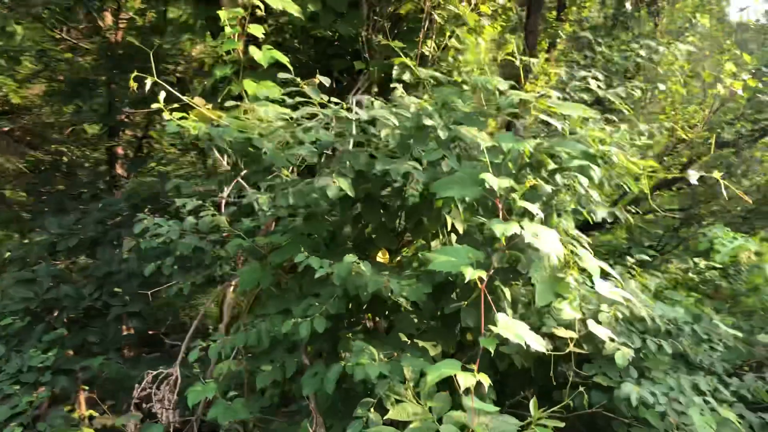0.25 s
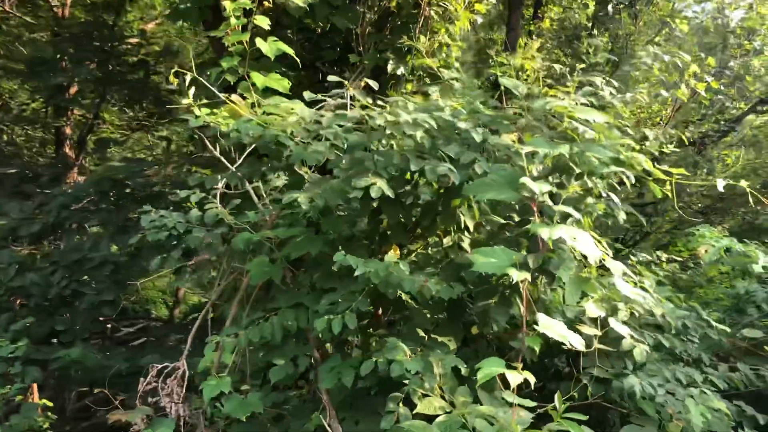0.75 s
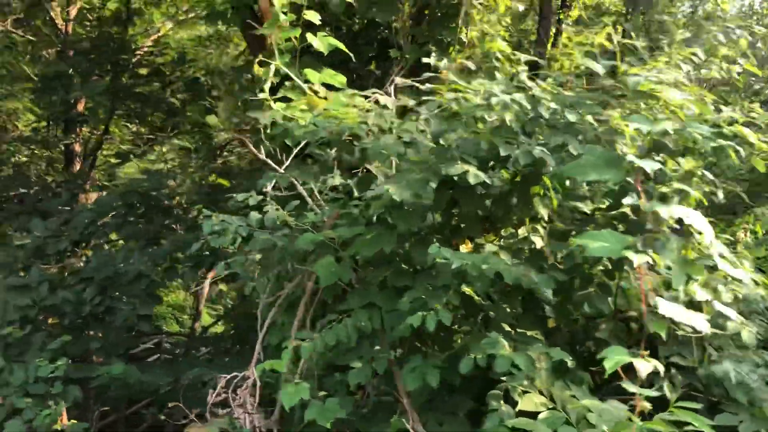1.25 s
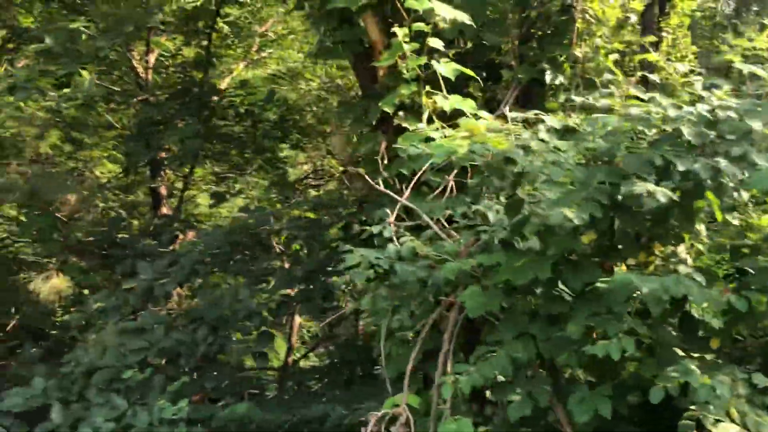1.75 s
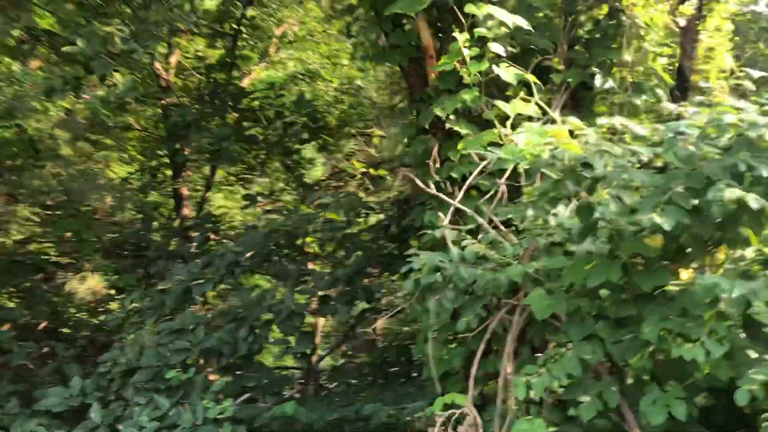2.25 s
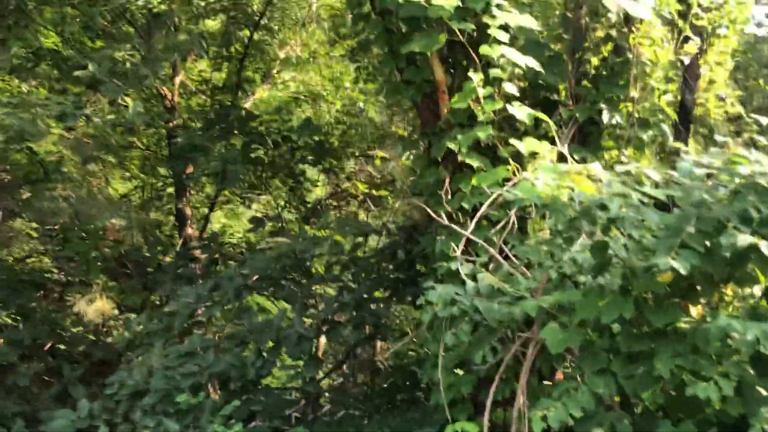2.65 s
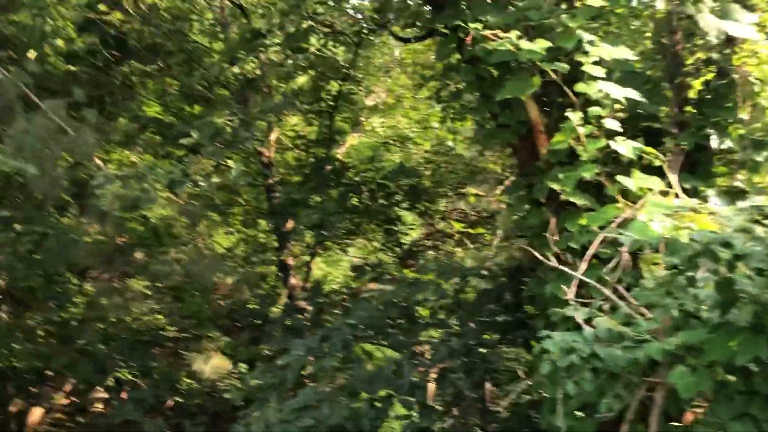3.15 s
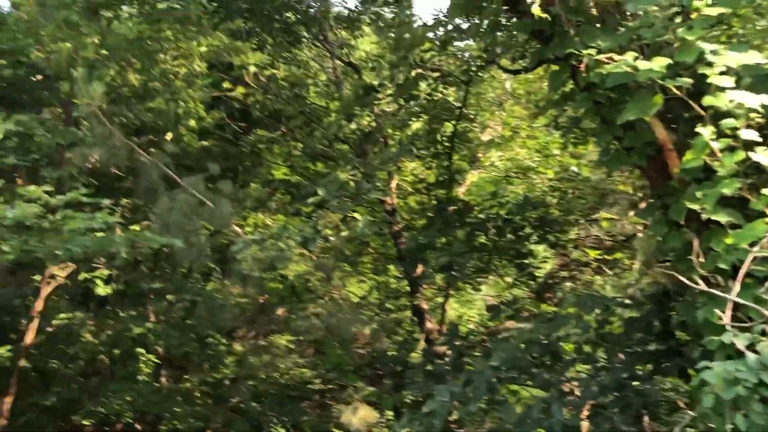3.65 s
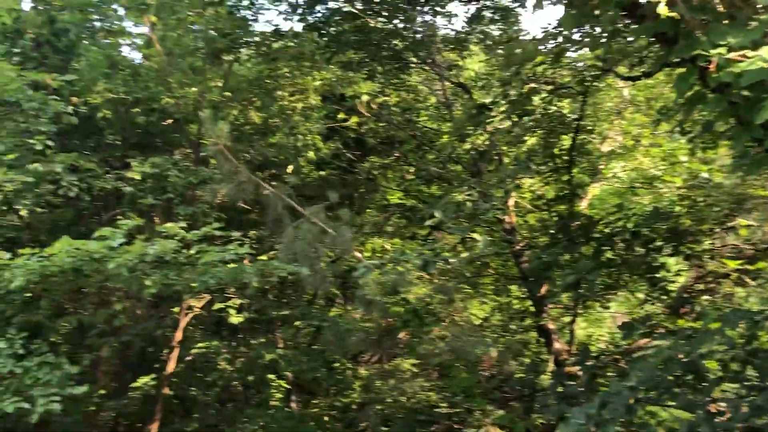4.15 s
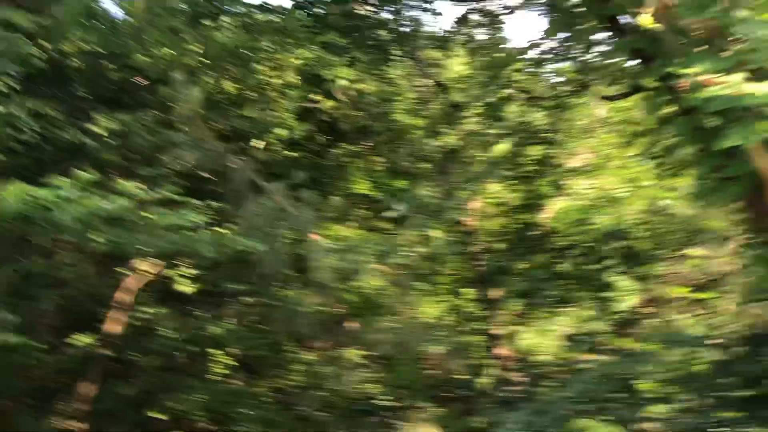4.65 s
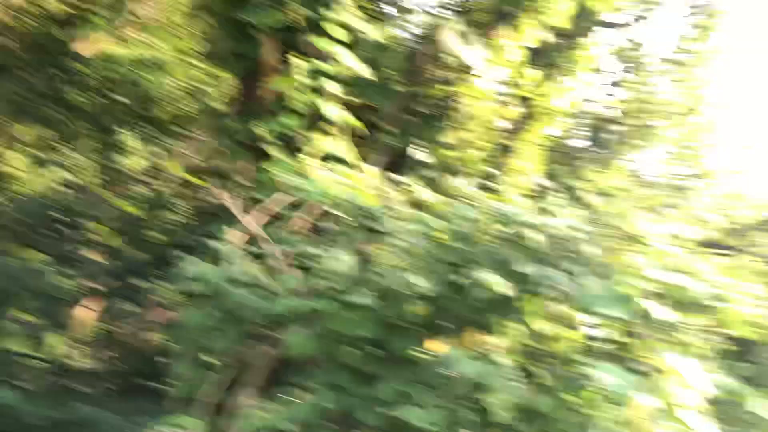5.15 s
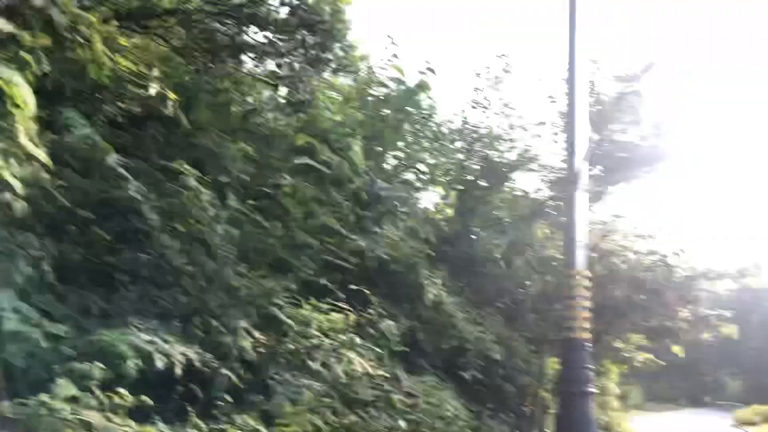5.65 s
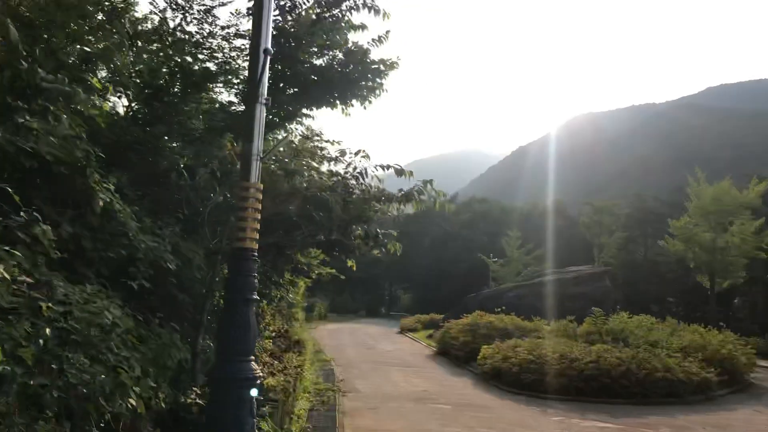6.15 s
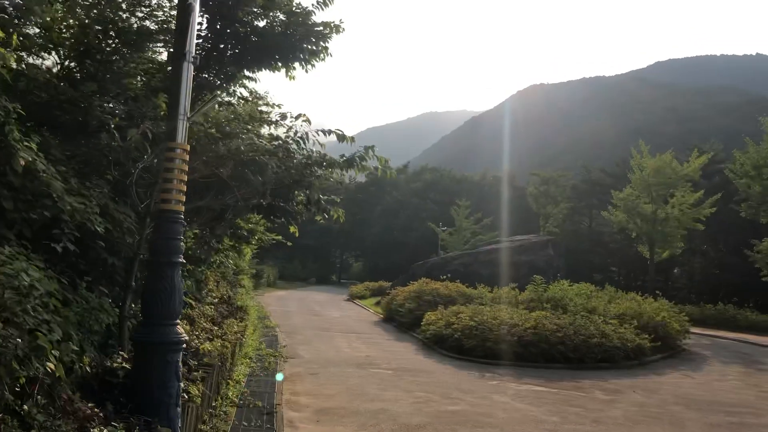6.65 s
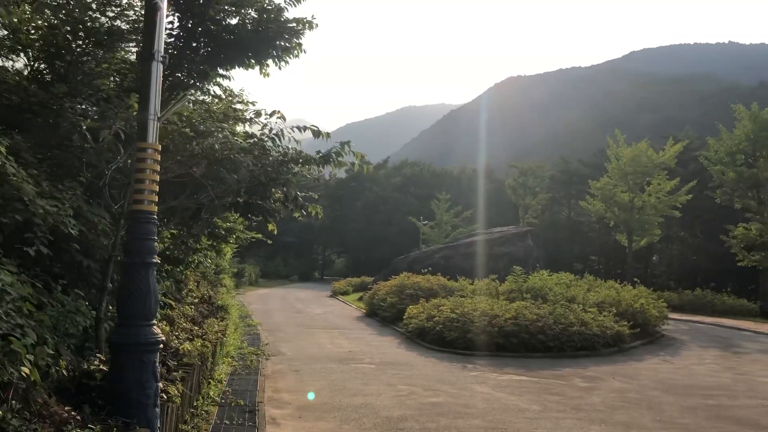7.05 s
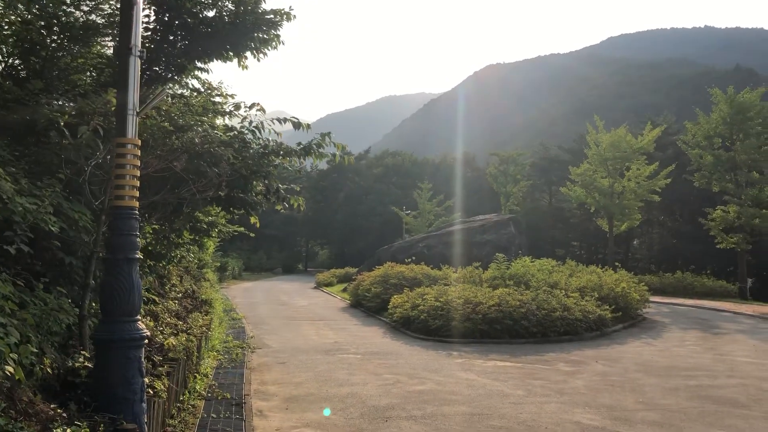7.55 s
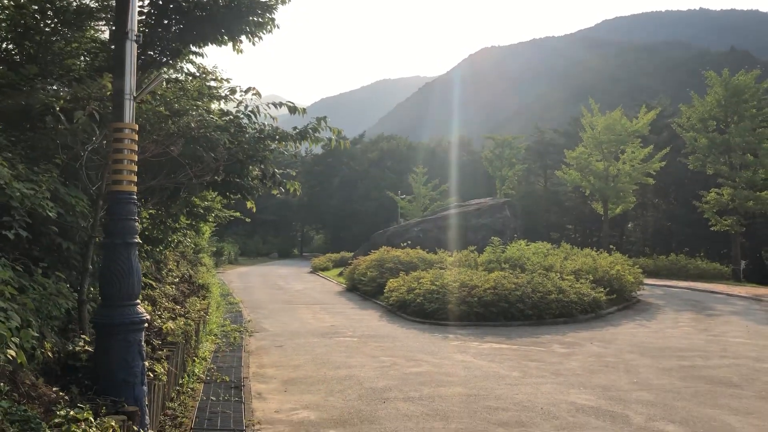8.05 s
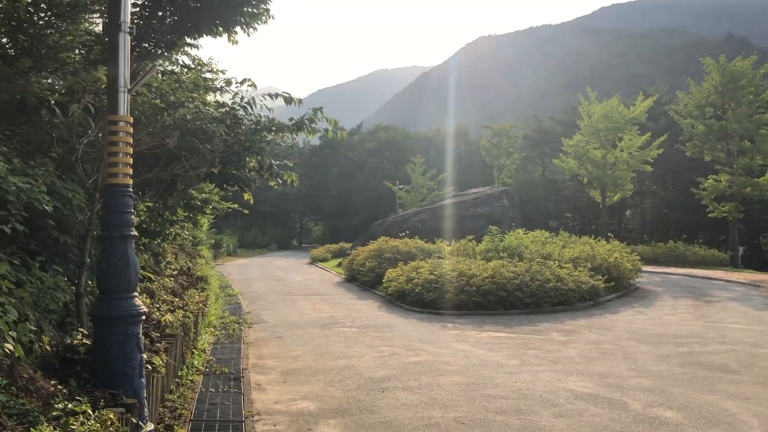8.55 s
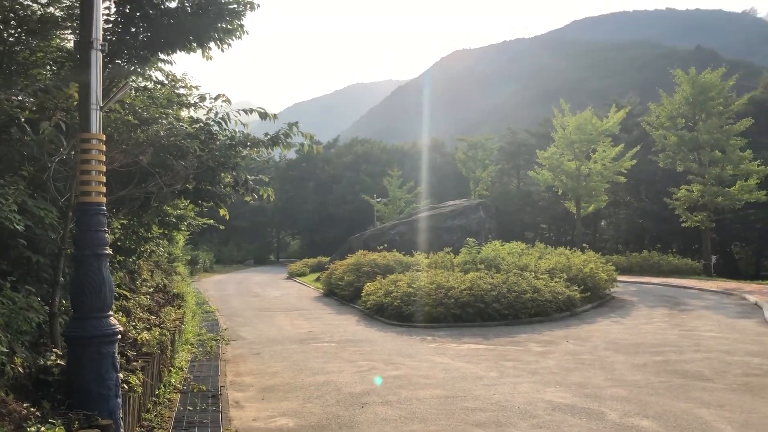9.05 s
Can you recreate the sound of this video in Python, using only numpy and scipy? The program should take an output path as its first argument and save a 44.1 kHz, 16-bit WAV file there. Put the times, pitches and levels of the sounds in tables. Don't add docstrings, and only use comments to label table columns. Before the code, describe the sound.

A thick, bright wall of cicada hiss runs throughout, with nearer drones swelling and stopping among the trees. Bush crickets rasp and low callers throb irregularly. A faint distant engine climbs, shifts gear and fades in the first seconds over a low hum. Fingers knock and rub the handheld recorder. After it swings toward an open path, the hiss brightens and a single steady cicada buzz emerges.

```python
import sys
import numpy as np
from scipy import signal
from scipy.fft import rfft, irfft, next_fast_len
from scipy.io import wavfile
from scipy.ndimage import uniform_filter1d

SR = 44100
rng = np.random.default_rng(int(sys.argv[2]) if len(sys.argv) > 2 else 0)


def level_to_linear(level):
    exponent = np.asarray(level, float) / 20
    return 10 ** exponent


def store_wav(level_fs):
    pcm = np.round(np.clip(np.atleast_2d(level_fs), -1, 1) * 32767)
    wavfile.write(sys.argv[1], SR, pcm.T.astype(np.int16))


N = 410571
T = np.arange(N) / SR
TURN_S = (5.17, 6)


def evened(x):
    return x / np.sqrt(np.mean(x ** 2) + 1e-20)


def read(points, hz):
    f, value = np.transpose(points)
    return np.interp(np.log(hz + 1), np.log(f + 1), value)


def add(mix, s, sound):
    part = mix[max(round(s * SR), 0):][:len(sound)]
    part += sound[:len(part)]


def ring(x, hz, width_hz):
    turn = np.exp(2j * np.pi * np.cumsum(hz * np.ones(len(x))) / SR)
    r = np.exp(-np.pi * width_hz / SR)
    return (turn * signal.lfilter([(1 - r) ** 2], [1, -2 * r, r * r], x / turn + 1e-18)).real


def band(x, low_hz, high_hz):
    size = next_fast_len(x.shape[-1])
    hz = np.fft.rfftfreq(size, 1 / SR)
    passed = (hz > low_hz) & (hz < high_hz)
    return irfft(rfft(x, size) * passed, size)[..., :x.shape[-1]]


def wander(size, span):
    once = uniform_filter1d(rng.standard_normal(size), int(span))
    return evened(uniform_filter1d(once, int(span)))


def hiss(shape_db, patchy_db):
    hz = np.fft.rfftfreq(1024, 1 / SR)
    t = np.arange(N // 256 + 5) * 256 / SR
    a, b, patches = rng.standard_normal((len(t), len(hz), 3)).T
    patches = uniform_filter1d(patches, size=5, axis=0)
    patches = evened(uniform_filter1d(patches, size=70, axis=1))
    z = (a + 1j * b) * level_to_linear(shape_db(hz[:, None], t) + patchy_db * patches)
    return signal.istft(z, nperseg=1024, noverlap=768)[1][:N]


# (f/Hz, level/dB)
WASH = [(15, -41), (25, -30.5), (140, 1), (201, -4.5), (447, -17), (580, -17), (800, -19.5), (1120, -21),
        (1680, -23.5), (2090, -25.5), (2460, -16.5), (3000, -10), (3900, -27), (6600, -120)]
# (f/Hz, level/dB)
HUM = [(44, -73), (88, -65.5), (128, -61.5), (195, -64.5), (218, -68)]


def valley():
    noise = evened(hiss(lambda hz, t: read(WASH, hz) + 0 * t, patchy_db=1.8))
    level_db = -52 - 0.5 + np.interp(T, TURN_S, (-.6, .6))
    hum = sum(level_to_linear(db) * evened(ring(rng.standard_normal(N), hz, 4.4)) for hz, db in HUM)
    return level_to_linear(level_db) * noise + hum


# (start t/s, end t/s, shaft f/Hz at start, shaft f/Hz at end, level/dB)
GEARS = [
    (0.0, 2.15, 54.5, 95, -53),
    (2.15, 2.65, 56, 65.5, -59),
]
# (f/Hz, level/dB)
EXHAUST = [(55, -25), (70, -13), (82, 1), (92, -0.5), (110, 0), (155, -2.5), (165, -9.5), (190, -12)]


def engine():
    pull_bend, shift_s, shift_drop_hz = .36, .12, 5
    out = np.zeros(N)
    for t0, t1, hz0, hz1, db in GEARS:
        t = np.arange(t0, t1, 1 / SR)
        u = (t - t0) / (t1 - t0)
        climb = hz0 + (hz1 - hz0) * (u + pull_bend * u * (1 - u))
        hz = climb - shift_drop_hz * np.exp((t - t1) / shift_s)
        for k in (1, 2):
            tone = np.sqrt(2) * np.sin(2 * np.pi * k * np.cumsum(hz) / SR)
            tone = tone * signal.windows.tukey(len(t), .04)
            level_db = db + read(EXHAUST, k * hz) + 1.5 * wander(len(t), 3000)
            add(out, t0, level_to_linear(level_db) * tone)
    return out


# (t/s, length t/s, centre f/Hz, width f/Hz, level/dB)
RUBS = [(0.077, 0.1, 1100, 2200, -58), (1.039, 0.18, 600, 1394, -60.5), (5.501, 0.12, 500, 700, -64),
        (6.651, 0.27, 1100, 1200, -64), (7.747, .35, 700, 1600, -65), (8.295, 0.27, 1300, 900, -64),
        (0.847, 0.37, 330, 250, -63.5), (7.748, 0.32, 328, 250, -61.5), (8.948, 0.37, 900, 1600, -64)]


def rubs():
    out = np.zeros(N)
    for s, length, hz, width_hz, db in RUBS:
        size = round(length * SR)
        grains = rng.standard_normal(size) * level_to_linear(3.5 * wander(size, 120))
        add(out, s, level_to_linear(db) * evened(ring(grains, hz, width_hz)) * signal.windows.tukey(size, .6))
    return out


# (t/s, peak level/dB, f/Hz, cycles)
KNOCKS = [(.135, -42, 320, 2), (1.045, -40, 700, 1.7), (1.122, -52, 1380, 14), (1.155, -54, 1380, 37),
          (2.03, -41.5, 300, 2), (2.535, -45, 380, 2.5), (2.551, -41, 99, 2), (5.235, -49, 52.3, 2.5),
          (5.555, -38.5, 210, 2), (6.32, -32.5, 1020, 3.7), (6.321, -38.5, 453, 1.4),
          (6.319, -40, 1600, 1.5), (8.43, -50, 1450, 12), (4.08, -65, 646, 97), (9.052, -36.5, 340, 1.5),
          (9.087, -41.5, 427, 3.8)]


def knocks():
    out = np.zeros(N)
    for s, db, hz, cycles in KNOCKS:
        t = np.arange(-1.5 * cycles / hz, 1.5 * cycles / hz, 1 / SR)
        hump = np.exp(-(2.54 * t * hz / cycles) ** 2)
        add(out, s + t[0], level_to_linear(db) * np.cos(2 * np.pi * hz * t) * hump)
    return out


# (start t/s, hold t/s, effort level/dB, belly f/Hz)
THROBS = [(0.0, .12, -49, 3450), (.3, .03, -53, 3300), (.43, .04, -48.5, 3440), (.64, .06, -48, 3470),
          (1.083, 0.076, -48, 3370), (1.233, 0.092, -40.5, 3470), (1.38, .1, -46.5, 3340),
          (1.74, 0.16, -46, 3540), (2.184, 0.095, -47.5, 3420), (2.567, 0.056, -45.5, 3340),
          (2.786, .1, -41.5, 3490), (3.176, .06, -47, 3300), (3.29, .02, -51, 3520), (3.71, 0.1, -47, 3410),
          (3.85, .08, -45, 3530), (4.3, .08, -40.5, 3450), (4.473, .04, -45.5, 3500),
          (4.823, 0.055, -46.5, 3350), (5.11, .09, -47.5, 3480), (5.425, 0.049, -50, 3380),
          (5.763, 0.07, -49, 3500), (6.353, 0.043, -42.5, 3440), (6.43, .06, -48.5, 3420),
          (7.046, 0.027, -56, 3420), (7.228, .04, -47, 3480), (7.61, 0.039, -45, 3530),
          (8.103, .06, -48, 3410), (8.617, 0.076, -49.5, 3530), (8.83, .03, -45, 3500),
          (9.038, 0.053, -49.5, 3460)]


def surges():
    rise_s, fall_s = 0.032, 0.041
    power = level_to_linear(2 * np.interp(T, TURN_S, (-55, -53.5)))
    for s, hold, db, _ in THROBS:
        early, late = np.maximum(s - T, 0), np.maximum(T - s - hold, 0)
        power = power + level_to_linear(2 * db) * np.exp(-2 * (early / rise_s) ** 2 - 2 * late / fall_s)
    return np.sqrt(power)


# (syllable length t/s, offset 0-1, top pulse rate f/Hz, share)
CALLERS = [
    (.515, .62, 346, 1.1),
    (.29, .1, 337, .9),
    (.36, .45, 326, .8),
]


def low_callers():
    s, hold, _, belly_hz = np.transpose(THROBS)
    drive = 1.6 * rng.standard_normal(N)
    for length, offset, per_s, share in CALLERS:
        u = (T / length + offset) % 1
        turns = np.cumsum(per_s * (1 - .2 * length * u) * (1 + .009 * wander(N, 900))) / SR
        pulses = sum((.15 if k % 2 else 1) * np.cos(np.pi * k * turns) for k in range(15, 25))
        flutter = level_to_linear(3.0 * wander(N, 1300))
        drive = drive + share * evened(pulses * flutter * np.sin(np.pi * u) ** .5)
    belly = ring(drive, np.interp(T, s + hold / 2, belly_hz), 430)
    held = 1 / np.sqrt(uniform_filter1d(belly ** 2, size=3000) + 1e-9)
    belly, drive = evened(belly * held), drive * held
    breathy = drive + 1.5 * drive.std() * rng.standard_normal(N)
    below = evened(ring(breathy, 2750, 1000))
    return surges() * (belly + level_to_linear(-8.0) * below)


def clicks(per_s, jitter, rough):
    turns = np.cumsum(per_s * (1 + jitter * wander(len(per_s), 200))) / SR
    train = np.diff(np.floor(turns), prepend=0) * level_to_linear(2.0 * rng.standard_normal(len(per_s)))
    rough = np.clip(rough, 0, 1)
    return np.sqrt(1 - rough) * evened(train) + np.sqrt(rough) * rng.standard_normal(len(per_s))


def wings(size, modes_hz, modes_db, per_s):
    drive = clicks(per_s * np.ones(size), jitter=.1, rough=.55)
    return sum(level_to_linear(db) * evened(ring(drive, hz, 720)) for hz, db in zip(modes_hz, modes_db))


# (end of rasp t/s, low mode level/dB, high mode level/dB)
QUICK = [(1.055, -42, -44), (2.36, -45, -52), (3.67, -39, -48), (4.37, -48, -59.5), (4.94, -42, -45),
         (6.192, -40, -50), (7.425, -40, -46), (8.64, -41, -50)]
SLOW = [(1.055, -43, -52), (2.61, -39.5, -47), (4.11, -41, -44), (5.52, -44, -57)]


def bush_crickets():
    quick_wings, slow_wings = (11750, 14800, .25), (11250, 14100, .25)
    out = np.zeros(N)
    strokes = [(quick_wings, row) for row in QUICK] + [(slow_wings, row) for row in SLOW]
    for (low_hz, high_hz, length), (end, *db) in strokes:
        u = np.linspace(0, 1, round(length * SR))
        rise = .96 + .05 * np.sin(2.4 * u)
        rasp = wings(len(u), (low_hz * rise, high_hz * rise), db, per_s=270)
        rasp = rasp * level_to_linear(1.0 * wander(len(u), 500))
        add(out, end - length, rasp * u ** .6 * np.minimum((1 - u) / .1, 1))
        v = np.linspace(0, 1, round(.045 * SR))
        broad = level_to_linear(db[1] + 1.5) * evened(ring(rng.standard_normal(len(v)), 12000, 5000))
        chip = level_to_linear(-4.5) * wings(len(v), (low_hz, high_hz), db, per_s=440) + broad
        add(out, end + .05, chip * np.minimum(v / .08, 1) * (1 - v) ** .6)
    return out


# (t/s, f/Hz)
STEADY_RATE = [(5.7, 354.5), (6.6, 355.3), (7.6, 356.6), (8.4, 358), (9.3, 359.3)]
# (t/s, level/dB)
STEADY_DB = [(5.7, -57), (6.6, -41), (7.6, -35), (8.4, -39), (9.0, -38), (9.3, -34.5)]


def steady():
    rate = np.interp(T, *np.transpose(STEADY_RATE))
    turns = np.cumsum(rate * (1 + .0012 * wander(N, 1500))) / SR
    snaps = sum(np.cos(2 * np.pi * k * turns) for k in range(18, 28))
    body = evened(ring(snaps, 7900, 500)) + .6 * evened(ring(snaps, 8100, 2200))
    return level_to_linear(np.interp(T, *np.transpose(STEADY_DB), left=-120)) * evened(body)


def song(u, hz, width_hz, blur):
    t = np.arange(len(u)) / SR
    spacing, beat = rng.uniform(190, 230), rng.uniform(28.83, 33.22)
    turns = np.cumsum(1 + .002 * wander(len(u), 500) + .0025 * wander(len(u), 7000)) / SR
    line = np.sin(2 * np.pi * np.cumsum(hz * np.gradient(turns)))
    line = line * (1 + .3 * np.cos(2 * np.pi * spacing * turns))
    line = line * (1 + .55 * np.cos(2 * np.pi * beat * t))
    haze = ring(rng.standard_normal(len(u)), hz, width_hz)
    return evened(line) + blur * evened(haze)


# (start t/s, end t/s, drum f/Hz at start, drum f/Hz at end, level/dB)
CLEAR = [(.2, 1.7, 6150, 6290, -40.5), (2.3, 4.6, 5995, 5980, -39.5), (3.1, 4.75, 5545, 5520, -46),
         (2.7, 4.3, 6090, 6100, -44), (5.5, 6.3, 7530, 7470, -45), (6.0, 7.9, 7370, 7400, -48),
         (8.0, 9.0, 7140, 7170, -43.5), (7.9, 9.1, 8230, 8290, -45)]
VEILED = [(1.1, 2.6, 5810, 5750, -45), (2.1, 3.9, 6720, 6920, -35), (2.1, 3.2, 6550, 6650, -38),
          (2.4, 4.7, 6180, 6230, -37), (2.9, 4.95, 5690, 5540, -39), (3.4, 5.4, 6360, 6600, -40.5),
          (4.0, 5.48, 5880, 5900, -42.5), (4.5, 5.45, 6020, 5990, -40.5), (4.7, 5.4, 6360, 6300, -45),
          (4.6, 5.4, 6540, 6580, -40), (6.1, 6.6, 6400, 6450, -47), (7.0, 8.3, 5550, 5560, -55),
          (6.3, 8.25, 5990, 6140, -48.5), (6.3, 8.2, 5790, 5920, -50.5)]
HIDDEN = [(0, .5, 6450, 6350, -37.5), (.2, 1.3, 6620, 6720, -39.5), (1.5, 2.3, 6400, 6370, -44),
          (1.5, 2.4, 6900, 7200, -35), (2.5, 3.3, 8350, 8400, -39)]
GROUPS = [
    (0, 1.3, 7700, 7500, -35),
    (4.4, 6.3, 8500, 8200, -35),
]


def drones():
    draws = rng.random((48, 4)) * (10, 1, 750, 750) + (-.8, 0, 3700, 3700)
    far = [(max(t0, 0), t0 + .81 + .6 * d, f + g, f + g + 90 * (d - .4), -43) for t0, d, f, g in draws]
    # singers, line width Hz, level shift dB
    kinds = [(CLEAR, 55, .1), (VEILED, 90, .064), (HIDDEN, 200, .1), (GROUPS, 550, .1), (far, 32, -1.0)]
    out = np.zeros(N)
    for rows, width_hz, trim_db in kinds:
        for t0, t1, hz0, hz1, db in rows:
            u = np.linspace(0, 1, round((t1 - t0) * SR))
            swell = np.minimum((u + .03) / .28, 1) * np.minimum((1 - u) * (t1 - t0) / .1, 1)
            body = song(u, hz0 + (hz1 - hz0) * u, width_hz * 2.3, blur=width_hz / 85)
            level_db = db + trim_db + .8 * wander(len(u), 6000)
            add(out, t0, level_to_linear(level_db) * swell * evened(body))
    return out


# (t/s, level/dB, lean added to the swing: below .5 towards the trees, above .5 towards the open
CROWD = [(0.0, -27.5, 1), (1.2, -29, 0.41), (2.6, -28.5, 0.3), (4.6, -28, 0.79), (5.1, -27.5, 0.96),
         (6.2, -28.5, 0.48), (8.3, -30.5, 0.5), (8.6, -29.5, 0.54), (9.31, -30.5, 0.35)]
# (f/Hz, level/dB per Hz)
TREES = [(1060, -58), (1800, -41.5), (2470, -23.5), (3390, -17.5), (4170, -24), (4440, -24.5), (5230, -14),
         (5720, -11.5), (5990, -6), (7640, 0), (8670, -2.5), (9580, -10.5), (10900, -18.5), (12400, -21),
         (15600, -24)]
OPEN = [(1060, -41), (1800, -39.5), (2140, -30.5), (2450, -24.5), (3100, -22), (3450, -19), (4320, -26),
        (5320, -17.5), (5990, -16.5), (7640, -1.5), (8140, 3), (10900, -17.5), (12400, -20), (13900, -22),
        (15600, -24)]


def crowd():
    s, level_db, lean = np.transpose(CROWD)

    def shape_db(hz, t):
        facing = np.interp(t, TURN_S, (0, 1)) + np.interp(t, s, lean) - .5
        facing = np.clip(facing, -.3, 1.3)
        return (1 - facing) * read(TREES, hz) + facing * read(OPEN, hz)
    x = hiss(shape_db, patchy_db=.9)
    x = x / np.sqrt(uniform_filter1d(ring(x, 8360, 3270) ** 2, size=16000))
    return level_to_linear(np.interp(T, s, level_db) - 7.5 + 0.4 * wander(N, 3600)) * x


def scene():
    insects = crowd() + drones() + steady() + bush_crickets() + low_callers()
    mono = insects + engine() + valley() + knocks() + rubs()
    return np.array([mono, mono])


def top_cut(x):
    return signal.sosfilt(signal.butter(12, 16220, fs=SR, output="sos"), x)


# (t/s, low f/Hz, high f/Hz, level/dB)
SPLITS = [(3.042, 6230, 7700, -34), (3.042, 14400, 16000, -61), (3.575, 11700, 13900, -47),
          (5.2, 7000, 8300, -31), (5.2, 11700, 13900, -49), (9.008, 4600, 5700, -55)]


def record(dry):
    side = np.zeros(N)
    for s, low_hz, high_hz, db in SPLITS:
        fill = evened(band(rng.standard_normal(2048), low_hz, high_hz)) * np.sqrt(np.hanning(2048))
        add(side, s - 1024 / SR, level_to_linear(db) * fill)
    heard = band(dry, 30, 15740) + np.outer([1, -1], side)
    return top_cut(heard)


dry = scene()
out = record(dry)
store_wav(out)
```